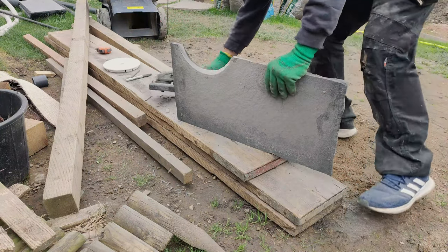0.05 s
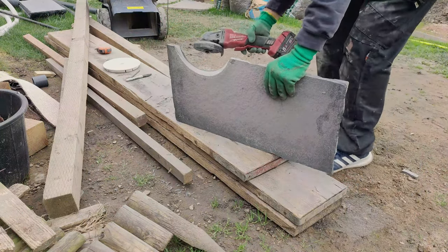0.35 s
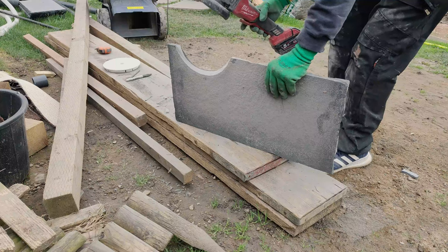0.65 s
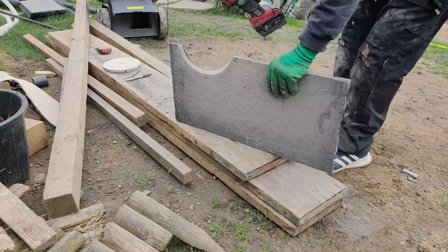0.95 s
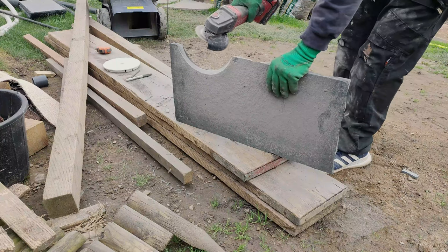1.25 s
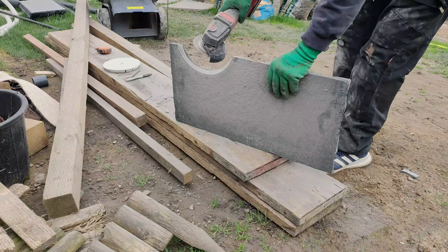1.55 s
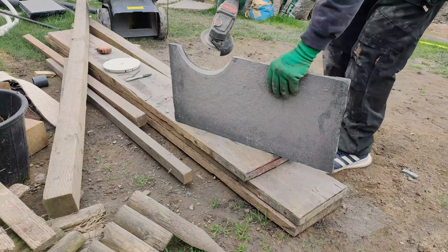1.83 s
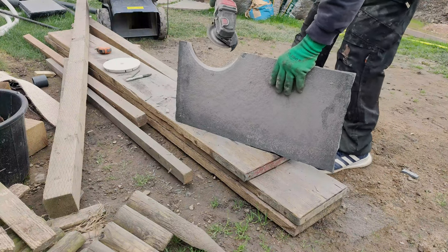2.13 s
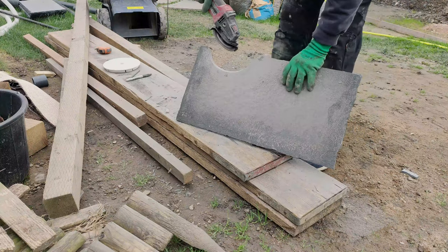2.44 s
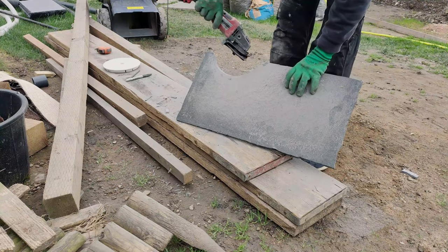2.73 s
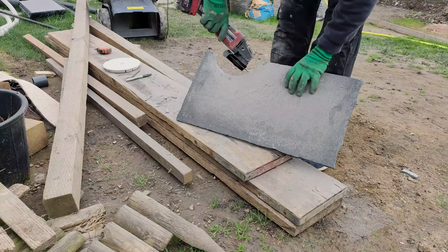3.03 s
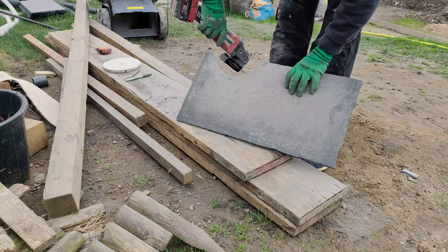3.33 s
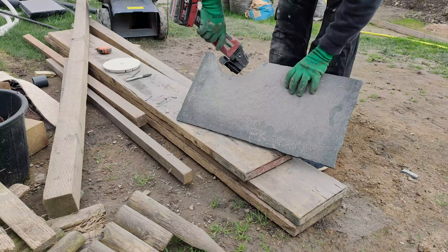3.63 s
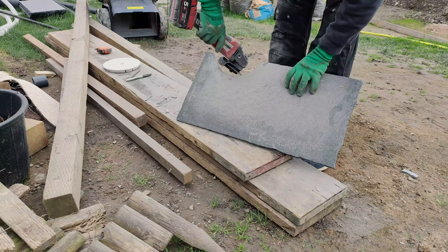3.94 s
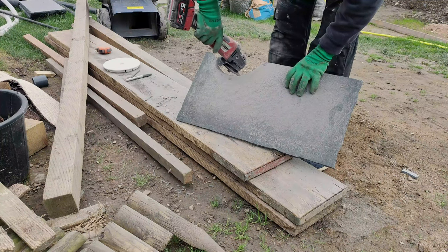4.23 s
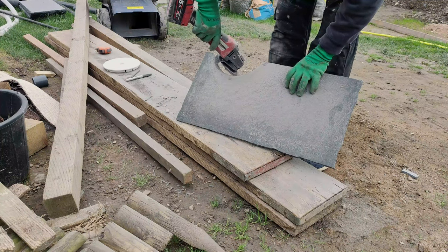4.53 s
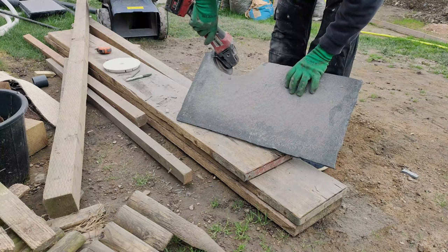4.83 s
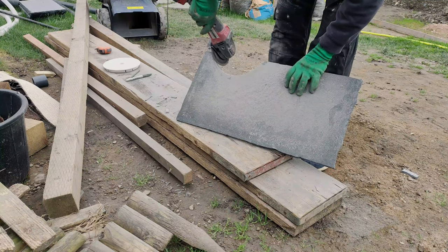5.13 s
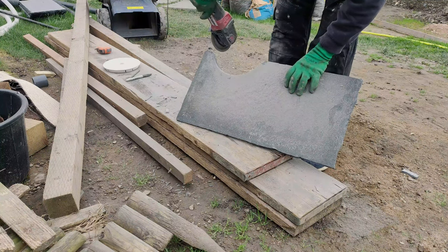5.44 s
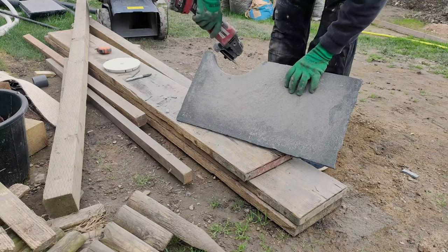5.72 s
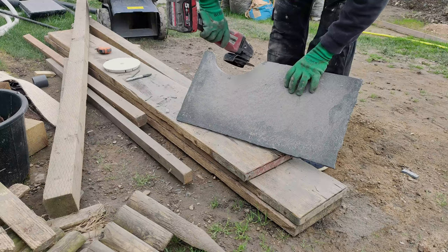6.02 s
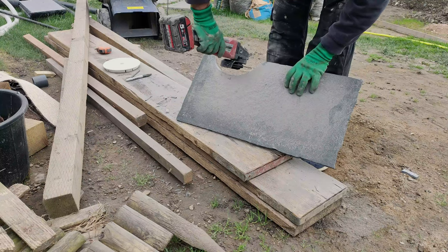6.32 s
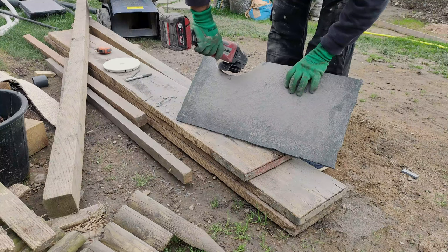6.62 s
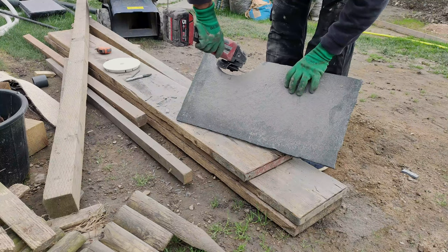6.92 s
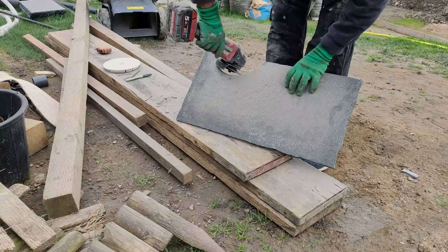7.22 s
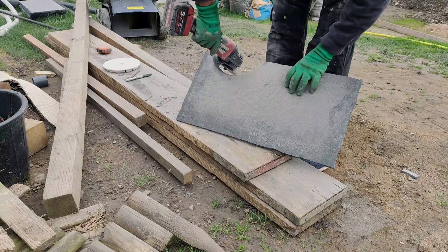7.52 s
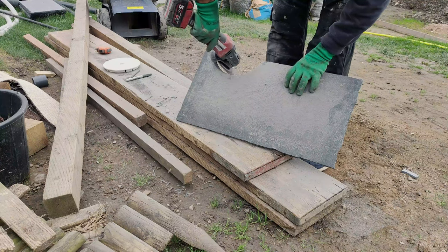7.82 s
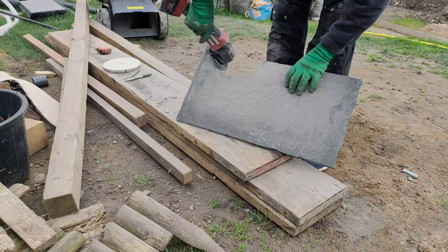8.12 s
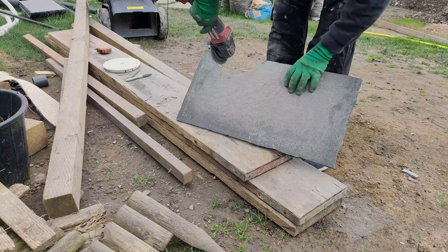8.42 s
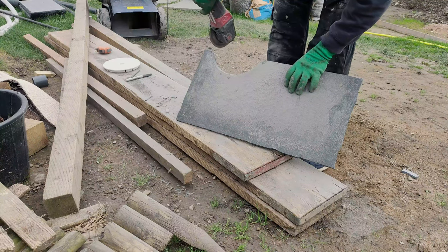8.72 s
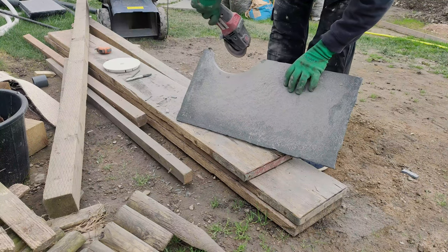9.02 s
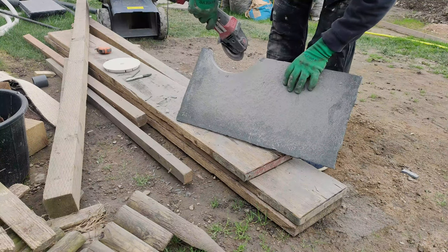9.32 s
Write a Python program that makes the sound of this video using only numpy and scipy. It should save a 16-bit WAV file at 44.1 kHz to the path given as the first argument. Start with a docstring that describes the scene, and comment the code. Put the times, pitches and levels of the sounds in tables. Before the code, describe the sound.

After faint tool clinks and a switch click, a cordless angle grinder spins up to a high whine with rattling gears. It presses onto a stone slab with a gritty rasp, fast chatter and a thin metallic squeal, runs free, then grinds twice more before it is switched off and winds down. It is heard from a metre or two away in a quiet garden, with wind bumping the microphone.

```python
"""A cordless angle grinder trims a stone slab in a garden, a metre or two from a phone's two microphones.
The motor whines and its unloaded bevel gears rattle. Pressed on the stone, the gears fall quiet while
the rim knocks on every turn, grit rasps and the steel disc sings. At last the motor brakes.
Small handling noises come first, and a breeze buffets the microphones."""
import sys
import numpy as np
from scipy import signal
from scipy.fft import rfft, irfft
from scipy.io import wavfile
from scipy.ndimage import uniform_filter1d

SR = 44100
rng = np.random.default_rng(int(sys.argv[2]) if len(sys.argv) > 2 else 0)


def file_out(sig):
    """Save sig as 16-bit WAV at sys.argv[1]."""
    # one column per channel
    cols = np.atleast_2d(sig).T
    # limit, then scale
    lim = np.clip(cols, -1, 1)
    pcm = np.round(lim * 32767).astype(np.int16)
    wavfile.write(sys.argv[1], SR, pcm)


N = 412776
TIME = np.arange(N) / SR
FREQS = np.maximum(np.arange(N // 2 + 1) * SR / N, 1)


def undb(db):
    return 10 ** (np.asarray(db) / 20)


def unit(x):
    """Scale to rms 1."""
    return x / np.sqrt(np.mean(x ** 2))


def noise():
    return rng.standard_normal(N)


def curve(rows, column=1):
    """One column of a timed table at every sample."""
    rows = np.array(rows)
    return np.interp(TIME, rows[:, 0], rows[:, column])


def across(points):
    """A table of Hz and value at every frequency."""
    hz, value = np.transpose(points)
    return np.interp(np.log(FREQS), np.log(hz), value)


def walk(rate):
    """Smooth wandering, rms 1, with `rate` new values a second."""
    step = max(int(SR / rate), 2)
    stairs = np.repeat(rng.standard_normal(N // step + 1), step)
    return unit(uniform_filter1d(stairs, step)[:N])


def held(start, end, attack, release):
    """Rises from the start, holds, and dies away after the end."""
    rise = -np.expm1(-np.maximum(TIME - start, 0) / attack)
    return rise * np.exp(-np.clip((TIME - end) / release, 0, 30))


def swell(s, length):
    """A smooth hump around a moment, `length` wide at half height."""
    return .5 ** np.minimum((2 * (TIME - s) / length) ** 2, 40)


def bursts(times_db, decay):
    """Envelope of sudden blows that die away."""
    return sum(undb(db) * (TIME >= s) * np.exp(-np.abs(TIME - s) / decay) for s, db in times_db)


def impacts(per_second, spread_db):
    """Random tiny blows of unequal size."""
    blows = (rng.random(N) < per_second / SR) * rng.choice([-1, 1], N)
    return unit(blows * undb(spread_db * np.clip(noise(), -2, 2)))


def colour(x, points):
    """Causal filter with the given spectrum; rms 1."""
    skirt = np.log(np.minimum(FREQS / points[0][0], 1) ** 2 + 1e-3)
    cepstrum = irfft(np.log(undb(across(points))) + skirt, N)
    cepstrum[1:N // 2] *= 2
    cepstrum[N // 2 + 1:] = 0
    return unit(irfft(rfft(x) * np.exp(rfft(cepstrum)), N))


def ring(x, modes):
    """Drive a set of resonances; rms 1."""
    response = sum((-1) ** k * undb(db) / np.sqrt(width) / (1 + 1j * (FREQS - hz ** 2 / FREQS) / width)
                   for k, (hz, width, db) in enumerate(modes))
    return unit(irfft(rfft(x) * response, N))


def tone(turns, order, waver, lead=0.):
    """The nearest whole multiple of a shaft's rotation; phase waver and left lead in radians."""
    phase = 2 * np.pi * round(order) * turns + waver * walk(70)
    return np.sqrt(2) * np.sin(phase + np.array([[lead], [0]]))


def pan(x, db):
    """Place a sound at constant power, left minus right in dB."""
    gains = np.array([undb(db / 2), undb(-db / 2)]).reshape(2, -1)
    return x * gains / np.sqrt(np.mean(gains ** 2, axis=0))


def scatter(x, low_db, high_db, decay=0.0064):
    """Slab, planks and ground send each microphone its own brief reflections, mostly in the treble."""
    t = TIME[:SR // 12]
    cloud = rng.standard_normal((2, len(t))) * np.exp(-t / decay)
    cloud /= np.sqrt(np.sum(cloud ** 2, axis=1, keepdims=True))
    share = undb(np.minimum(across([(700, low_db), (6000, high_db)]), 0))
    echoes = signal.fftconvolve(x[None], cloud, axes=1)[:, :N]
    return irfft((rfft(x) + share * rfft(echoes)) / np.sqrt(1 + share ** 2), N)


# Open air all round the phone. Each row: frequency in Hz, relative level in dB.
AIR_SPECTRUM = [(15, -29), (25, 4), (61, -6.5), (212, -11), (317, -13), (363, -15.5), (545, -17.5),
                (734, -17), (4030, -29), (4870, -26.5), (5730, -33.5), (10700, -42), (16000, -52)]

def garden():
    """Quiet open air with a hum far off."""
    air = np.array([colour(noise(), AIR_SPECTRUM) * undb(1.8 * walk(7)) for _ in range(2)])
    hum = np.sin(2 * np.pi * np.cumsum(317 + 2.58 * walk(5)) / SR)
    return air * undb(-58) + hum * undb(-64.5 + 2 * walk(9.4))


# Wind right on the microphones. Each row: frequency in Hz, relative level in dB.
WIND_SPECTRUM = [(12, -36), (20, 0), (45, -0.5), (100, -6.5), (195, -17.5), (233, -16), (350, -29.5),
                 (460, -47), (770, -120)]
# Each row: peak time in seconds, length in seconds, level in dB, left minus right in dB.
WIND_GUSTS = [(1.75, 0.42, -39, -6), (2.41, 0.34, -41, -6), (2.786, .12, -26.5, -16),
              (3.203, 0.62, -29, -8), (3.344, 0.091, -22.5, 19), (3.506, 0.11, -20.5, -4),
              (4.003, 0.073, -29, -12), (6.663, 0.19, -36, -8), (7.05, .3, -37.5, -3),
              (7.902, 0.44, -44, -7), (9.247, 0.21, -37, -2)]

def breeze():
    """The wind gets up and gusts; its eddies hit each microphone port separately."""
    eddies = np.array([colour(noise(), WIND_SPECTRUM) * unit(undb(3.24 * walk(18))) for _ in range(2)])
    steady = undb(-61.5) + undb(-49.5) * np.clip((TIME - 0.6) / 0.8, 0, 1)
    gusts = sum(pan(swell(s, length) * undb(db), side_db) for s, length, db, side_db in WIND_GUSTS)
    return eddies * np.hypot(pan(steady, db=-2), gusts)


# The gear head's resonances. Each row: frequency in Hz, width in Hz, relative level in dB.
HEAD_MODES = [(4200, 150, -14.5), (4190, 740, 6), (4860, 240, 4.5), (5133, 99, 1)]
# The head clinks as the tool is lifted. Each row: time in seconds, level in dB.
HEAD_CLINKS = [(.14, -65), (.255, -56), (.39, -67), (.92, -58)]
# Handling and the switch. Each row: time in seconds, level in dB, decay in seconds.
HAND_CLICKS = [(0.498, -50.5, 0.0097), (1.015, -30.5, 0.0022), (1.058, -36, 0.021)]
# Colour of the clicks and the scuff. Each row: frequency in Hz, relative level in dB.
CLICK_SPECTRUM = [(180, -45), (300, -17), (1080, -13), (1610, -9), (1840, 0), (2100, -2), (4160, -12),
                  (9390, -30), (16000, -37)]

def handling():
    """A step or two away the tool clinks, a shoe scuffs the soil and the switch snaps."""
    snaps = sum(bursts([(s, db)], decay) for s, db, decay in HAND_CLICKS)
    scuff = undb(-59) * swell(0.485, length=0.083)
    sound = colour(noise(), CLICK_SPECTRUM) * (snaps + scuff)
    sound += ring(noise(), HEAD_MODES) * bursts(HEAD_CLINKS, decay=0.0076)
    return scatter(sound, 0, 2, decay=0.013)


START_S, OFF_S, BRAKE_S = 1.06, 8.88, 9.1
KICK_HZ, FULL_HZ, SAG_HZ_PER_S2 = 55.4, 313.9, 557
RUN_UP_S, BRAKING_S = 0.0695, 0.35  # time constants

def shaft_speed():
    """Turns a second: the motor runs up to its governed speed, sags when switched off, then brakes."""
    run_up = FULL_HZ - (FULL_HZ - KICK_HZ) * np.exp(-np.maximum(TIME - START_S, 0) / RUN_UP_S)
    sag = SAG_HZ_PER_S2 * (np.clip(TIME, OFF_S, BRAKE_S) - OFF_S) ** 2
    return (run_up - sag) * np.exp(-np.maximum(TIME - BRAKE_S, 0) / BRAKING_S)


# The four-pole motor running free. Each row: time in seconds, levels in dB of orders 4, 8, 20 and 39.
WHINE_LEVELS = [(1.35, -35.5, -42, -39.5, -40), (2.2, -34.5, -34.5, -48, -45), (2.5, -40, -35.5, -46, -40),
                (3.6, -43.5, -29, -31.5, -35.5), (5.55, -38.5, -28, -45, -40), (5.8, -46, -42.5, -40, -40),
                (6.4, -50, -26.5, -37.5, -40), (7.1, -46, -31.5, -40, -40), (8.9, -35, -31, -40, -44)]
# Each row: multiple of the shaft speed, level in dB, change at full torque in dB.
WEAK_ORDERS = [(1, -57, -9), (2, -50, -3), (3, -41.5, -24), (12, -46, 6), (14, -50, 12), (24, -66, 2)]
# Air from the cooling fan. Each row: frequency in Hz, relative level in dB.
FAN_SPECTRUM = [(120, -61), (200, -30.5), (791, -8), (916, -10.5), (1840, -12.5), (2510, -9.5), (2700, 0.5),
                (4950, -6.5), (5520, -18), (6170, -4.5), (7010, -21.5), (12600, -22), (16000, -35)]

def motor(hz, turns, load, torque):
    """Shaft orders waver in strength and soften under load; the cooling fan rushes with the speed."""
    pace = hz / hz.max()
    db4, db8, db20, db39 = (curve(WHINE_LEVELS, column) for column in (1, 2, 3, 4))
    out = tone(turns, 4, waver=0.12, lead=0.75) * undb(db4 - 14.5 * load - 10.5 * torque + walk(45))
    out += tone(turns, 8, waver=0.21, lead=0.12) * undb(db8 - 11.3 * load - 19 * torque + 2.1 * walk(45))
    out += (tone(turns, 16, waver=0.3, lead=-1.9)
            * undb(-29 - 5.9 * load - 20 * torque + 2 * walk(60) + 1.2 * walk(8)))
    out += tone(turns, 20, waver=0.31) * undb(db20 - 10 * load - 5.1 * torque + 2 * walk(60))
    out += (tone(turns, 39, waver=0.63, lead=-1.44) * pace ** 3
            * undb(db39 - 10 * load - 5 * torque + 1.5 * walk(60) + 1.5 * walk(5)))
    for order, db, torque_db in WEAK_ORDERS:
        level_db = db - 7.8 * load + torque_db * torque
        out += tone(turns, order, waver=0.45) * pace * undb(level_db + 1.74 * walk(6) + 4.1 * walk(90))
    fan = scatter(colour(noise(), FAN_SPECTRUM), -9, 4.8)
    return out + fan * pace ** 2 * undb(-30)


# Fizz of the brushes. Each row: frequency in Hz, relative level in dB.
BRUSH_SPECTRUM = [(2500, -11.5), (5300, 3), (7000, -1.5), (9000, -19.5), (12000, -17), (16000, -19)]
# Each row: multiple of the shaft speed, braking level in dB, housing resonance in Hz, its width in Hz,
# change in dB when driving instead of braking.
HOWL_ORDERS = [(4, -27.5, 750, 190, -3), (13.94, -19.5, 3860, 200, -22), (16, -17, 2990, 210, -9),
               (26, -33.5, 5400, 1800, -8), (39, -38, 10500, 2500, -21)]

def howl(hz, turns, torque):
    """Heavy current on starting and braking: brushes fizz and orders sweep through the resonances."""
    driving = np.gradient(uniform_filter1d(hz, SR // 10)) > 0
    fizz = scatter(colour(impacts(5000, 5.6), BRUSH_SPECTRUM), -8, -1.6)
    out = fizz * undb(-23 - 6.7 * driving)
    for order, db, centre_hz, width_hz, driving_db in HOWL_ORDERS:
        resonance = 1 / np.hypot(1, 2 * (order * hz - centre_hz) / width_hz)
        level_db = db + driving_db * driving
        out += tone(turns, order, waver=0.47) * resonance * undb(level_db + 2.1 * walk(160))
    return out * torque


# Loose teeth rattling. Each row: frequency in Hz, relative level in dB.
RATTLE_SPECTRUM = [(180, -37.5), (300, -22.5), (440, -14.5), (645, -3), (787, -14), (915, 3.5), (1100, -8),
                   (1970, -7.5), (2440, -4), (3950, 1), (4910, -5), (5520, -10), (11700, -22.5),
                   (12700, -22), (16000, -25)]
# The motor housing's resonances. Each row: frequency in Hz, width in Hz, relative level in dB.
HOUSING_MODES = [(664, 210, -3), (916, 220, 1), (3000, 160, 2), (3244, 160, -3.5), (3190, 340, -3.5),
                 (3920, 260, 7.5)]
# The rattle with the disc running free. Each row: time in seconds, level in dB.
FREE_RATTLE = [(1.2, -27), (2.2, -25.5), (3.5, -21), (4, -21.5), (5.55, -24.5), (6, -21.5), (6.6, -19.5),
               (7.2, -21.5), (8.85, -24.5), (9.36, -26.5)]
# Loud fits from the gear head. Each row: peak time in seconds, length in seconds, level in dB.
CLANK_FITS = [(1.31, 0.073, -27.5), (1.65, 0.18, -23.5), (1.93, 0.028, -19.5), (2.2, 0.017, -23),
              (2.28, .05, -23), (2.5, 0.023, -21), (2.687, .1, -20.5), (3.478, 0.085, -16.5),
              (3.68, 0.074, -22), (3.966, 0.053, -20), (5.63, 0.022, -20), (5.707, 0.057, -16),
              (5.843, 0.11, -23.5), (5.998, .02, -22), (6.062, 0.015, -14), (6.2, .06, -28),
              (6.585, .04, -20.5), (6.864, 0.068, -17), (8.92, 0.074, -23), (9.102, 0.026, -22),
              (9.255, 0.049, -26)]
GEAR_RATIO = 2.953  # motor turns per disc turn

def gears(hz, turns, load, torque):
    """Unloaded teeth bounce across their backlash, in flurries, and ring the housing and gear head."""
    flurry = undb(1.04 * walk(100)) * (1 + 0.26 * np.sin(4 * np.pi * turns / GEAR_RATIO))
    teeth = impacts(13 * hz, 3.6) * flurry
    rattle = colour(teeth, RATTLE_SPECTRUM) + undb(-5.5) * ring(teeth, HOUSING_MODES)
    rattle *= undb(curve(FREE_RATTLE) + 3.5 * torque)
    # the disc rocks in the backlash and lands harder about 45 times a second
    rocking = np.cumsum(45 * (1 + .25 * walk(40))) / SR % 1
    head = ring(impacts(2500, 4.2) * (0.34 + np.exp(-rocking / 0.18)), HEAD_MODES)
    fits = sum(undb(db) * swell(s, length) for s, length, db in CLANK_FITS)
    clank = head * np.hypot(fits, undb(-28.5 + 3 * walk(16)))
    return scatter((rattle + clank) * (1 - load), -5, 4.5)


# The disc on the slab. Each row: start in seconds, end in seconds, seated knock level in dB,
# seated grit level in dB, seating time constant in seconds.
STONE_PASSES = [(3.801, 3.826, -19, -27, .002), (4.065, 5.442, -21.5, -23.5, 0.53),
                (6.705, 6.72, -17, -22, 0.0022), (7.209, 8.126, -19.5, -26, 0.16),
                (8.243, 8.751, -23, -24, 0.012)]
# The disc briefly loses pressure. Each row: time in seconds, length in seconds, dip in dB.
DISC_SKIPS = [(4.131, 0.041, -6.5), (4.597, 0.019, -6.5), (4.805, 0.017, -17), (4.99, 0.027, -14),
              (7.328, 0.012, -16), (7.464, 0.017, -5)]

def passes():
    """Envelopes of knock, grit and touch; until the rim is seated it knocks more and grinds less."""
    knock = grit = touch = 0
    pressure = undb(sum(db * swell(s, length) for s, length, db in DISC_SKIPS) + 1.05 * walk(25))
    for start, end, knock_db, grit_db, seat_s in STONE_PASSES:
        on = held(start, end, attack=0.00093, release=0.011)
        unseated = np.exp(-np.maximum(TIME - start, 0) / seat_s)
        knock += on * undb(knock_db + 4 * unseated)
        grit += on * undb(grit_db - 6.5 * unseated)
        touch += on
    return knock * pressure, grit * pressure, touch


def gear_load():
    """The teeth are pressed together (1) as the stone bites and stay so a moment after each pass."""
    pressed = [held(start - .004, end + .076, attack=.0018, release=.02)
               for start, end, *_ in STONE_PASSES]
    return np.max(pressed, axis=0)


# High spots on the rim. Each row: place in turns, decay length in turns, relative strength.
RIM_SPOTS = [(0.102, 0.13, 0.74), (0.5, 0.07, 0.39), (.75, .08, 0.16)]
# How much the disc hops instead of sliding. Each row: time in seconds, share from 0 to 1.
HOP_SHARE = [(4.35, 0.75), (5, .56), (5.25, 1), (7.3, 1), (7.8, 0.07), (8.3, .86)]
# The rim catches the stone, or the gears slam free. Each row: time in seconds, level in dB.
JOLTS = [(3.8035, -14), (5.534, -17), (6.707, -19), (7.212, -18), (8.229, -17)]
# The tool stands upright, grinding with the outer edge. Each row: start and end in seconds.
EDGE_SPANS = [(4.98, 5.5), (8.2, 8.8)]
# The rim's knock and the grit's rasp. Each row: frequency in Hz, relative level in dB.
KNOCK_SPECTRUM = [(500, -25), (900, -19), (1400, -23), (2000, -22.5), (2500, -18), (3100, -4.5),
                  (3600, -12), (4100, -15.5), (4600, 0), (5000, 6), (5350, 0), (5700, -11), (7000, -21)]
GRIT_SPECTRUM = [(3000, -5), (5400, -8), (6500, 11.5), (7800, 4), (8300, 0.5), (9500, -8), (10000, -7.5),
                 (10600, -9), (12000, -5), (13800, -6.5), (15800, -0.5)]
# The steel disc's resonances. Each row: frequency in Hz, width in Hz, relative level in dB.
DISC_MODES = [(3058, 28, -1), (3190, 20, -3), (4720, 23, 0), (5160, 27, 4), (5300, 19, -2.5),
              (5910, 20, -2.5), (6924, 14, 3), (7950, 64, 2.5), (8000, 29, -4), (7800, 40, -4.5),
              (8610, 14, -3), (8880, 44, -2), (9620, 71, -1), (10000, 40, -11), (10593, 110, 6),
              (10800, 90, -32), (13100, 60, -5), (13100, 70, -7), (14080, 80, -6.5)]
# Hum of the loaded spindle. Each row: multiple of the disc speed, level in dB.
SPINDLE_ORDERS = [(1, -58), (2, -61.5), (4, -67), (8, -55), (9, -54), (13, -47.5), (16, -60)]

def cutting(disc_turns, knock_gain, grit_gain):
    """High spots of the rim strike the stone on every turn; grains break off and ring the disc."""
    place = disc_turns % 1
    bumps = unit(sum(size * undb(1.8 * walk(9) + 2.2 * walk(100)) * np.exp(-((place - at) % 1) / length)
                     for at, length, size in RIM_SPOTS))
    hop = np.clip(curve(HOP_SHARE), 0, 1)
    contact = np.sqrt(1 - hop + hop * bumps ** 2)
    # the same diamonds come round, so part of the scrape repeats, changing as the contact point moves
    diamonds = rng.choice([-1., 1.], size=(6, 400))
    on_stone = (place * diamonds.shape[1]).astype(int)
    shares = np.array([walk(5) for _ in diamonds])
    repeat = np.sum(shares * diamonds[:, on_stone], axis=0) / np.linalg.norm(shares, axis=0)
    scrape = (1.23 * repeat + noise()) * contact
    # on edge, the knock is pitched higher and the disc sings louder
    tilt = np.minimum(sum(held(start, end, 0.079, .05) for start, end in EDGE_SPANS), 1)
    edge_spectrum = [(hz * 1.04, db) for hz, db in KNOCK_SPECTRUM]
    knock = colour(scrape, KNOCK_SPECTRUM) * (1 - tilt) + colour(scrape, edge_spectrum) * tilt
    jolt = bursts(JOLTS, decay=0.0065)
    knock = knock * knock_gain * undb(2.5) + colour(noise(), KNOCK_SPECTRUM) * jolt
    # grit keeps flying between the knocks, so it pulses less
    grains = impacts(20000, 1.5) * contact ** 0.8
    rasp = colour(grains + 0.77 * repeat, GRIT_SPECTRUM) * (grit_gain * undb(2) + jolt * undb(-18))
    drive = grains * grit_gain
    song = ring(drive, DISC_MODES) * np.std(drive) * undb(5 + 2 * tilt)
    hum = sum(tone(disc_turns, order, waver=0.27) * undb(db + 2.1 * walk(4.9))
              for order, db in SPINDLE_ORDERS)
    hum *= np.minimum(knock_gain / undb(-20), 1)
    return (scatter(knock, -0.58, 4, decay=0.0035) + scatter(rasp, -28, -0.27, decay=0.0031)
            + scatter(song, -1, 0, decay=0.003) + hum)


# Disc modes that can squeal. Each entry: name, frequency in Hz.
SQUEAL_MODES = {"low": 6045, "middle": 6706, "high": 7400, "top": 10530}
# Friction locks onto a mode. Each row: start in seconds, end in seconds, mode name, level in dB.
SQUEAL_SPANS = [(4.1, 5.2, "middle", -28.5), (4.55, 5.05, "top", -23), (5.2, 5.34, "low", -23.5),
                (5.4, 5.2, "high", -24), (7.2, 7.5, "low", -28), (7.5, 8.1, "low", -20),
                (7.45, 7.9, "middle", -26.5), (7.3, 8.13, "top", -25), (8.2, 8.76, "middle", -28),
                (8.2, 8.76, "top", -27), (8.3, 8.6, "high", -21)]
SINGING_DB = -38  # faint floor during any contact

def squeal(touch):
    """Friction feeds disc modes into unsteady tones; their phase drifts at each microphone."""
    out = 0
    for name, hz in SQUEAL_MODES.items():
        cycles = np.cumsum(hz + 17 * walk(160) + 10 * walk(6)) / SR
        drift = np.array([0.41 * walk(2.06), 0.71 * walk(3)])
        locked = sum(undb(db) * held(start, end, attack=0.048, release=0.038)
                     for start, end, mode, db in SQUEAL_SPANS if mode == name)
        strength = touch * np.hypot(undb(SINGING_DB), locked) * undb(1.4 * walk(70) + 1.2 * walk(8))
        out += np.sqrt(2) * np.sin(2 * np.pi * cycles + drift) * strength
    return out


# The two microphone ports differ in colour. Each row: frequency in Hz, left minus right in dB.
PORT_BALANCE = [(700, 2), (3200, 3.5), (4300, 9), (5000, 8), (5450, 7), (5900, -15), (7000, -3), (8500, -3),
                (10500, -2.5), (12000, -1), (15000, -3)]
# The tool is turned in front of the phone. Each row: time in seconds, left minus right in dB.
TOOL_AIM = [(1.1, 1), (3.97, 0.5), (4.28, -1.5), (4.69, 3), (5.08, 0), (5.4, 3), (5.63, 1), (7.27, 1),
            (7.5, -3.5), (8.05, 3), (8.9, 1)]

def scene():
    """The grinder a metre or two off, heard through two unlike ports, with the garden around it."""
    speed = uniform_filter1d(shaft_speed(), SR // 50)
    hz = speed * (1 + .0009 * walk(25))
    turns = np.cumsum(hz) / SR
    torque = np.tanh(np.abs(np.gradient(speed)) * SR / 520)  # 0-1, from speeding up or slowing
    load = gear_load()
    knock_gain, grit_gain, touch = passes()
    running = np.clip((TIME - START_S) / 0.03, 0, 1)
    machine = motor(hz, turns, load, torque) + howl(hz, turns, torque) + gears(hz, turns, load, torque)
    grinder = machine * running + cutting(turns / GEAR_RATIO, knock_gain, grit_gain) + squeal(touch)
    at_ports = irfft(pan(rfft(grinder), across(PORT_BALANCE)), N) * (TIME > START_S)
    return pan(at_ports, curve(TOOL_AIM) - .8) + handling() + garden() + breeze()


def record(dry):
    """The phone rounds the highest peaks and cuts the top of the treble."""
    lowpass = signal.ellip(10, .2, 70, 15900, fs=SR, output="sos")
    return signal.sosfilt(lowpass, np.tanh(1.15 * dry) / 1.15)


dry = scene()
out = record(dry)
file_out(out)
```